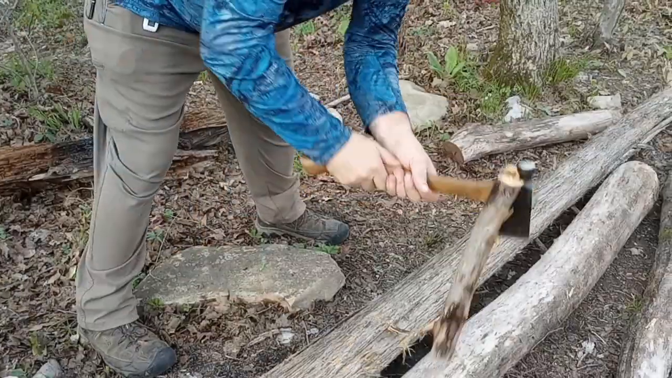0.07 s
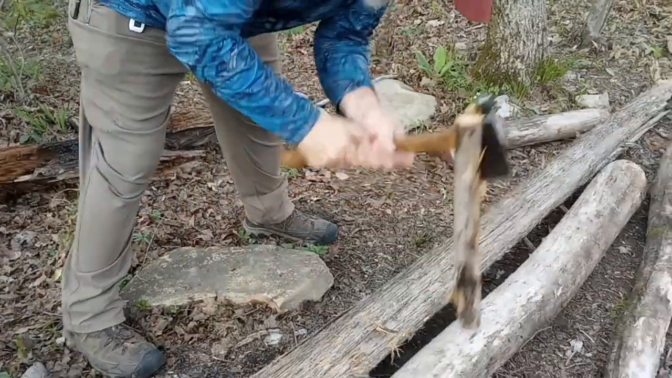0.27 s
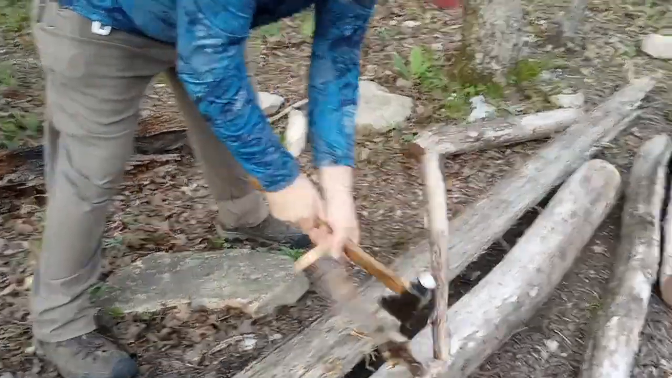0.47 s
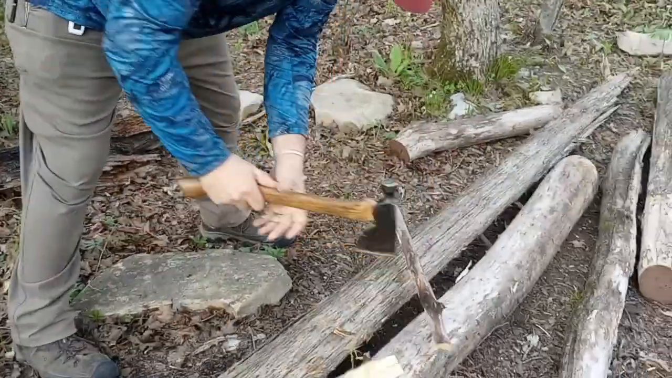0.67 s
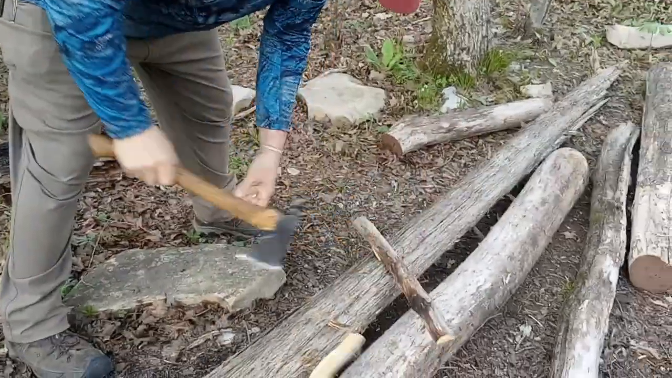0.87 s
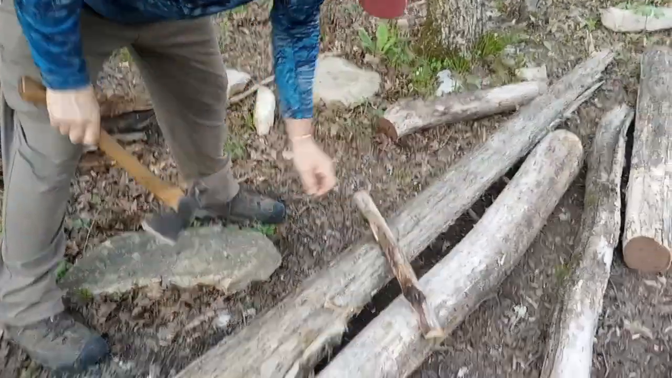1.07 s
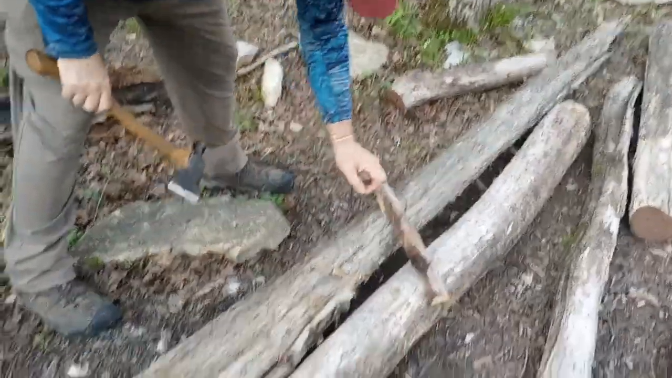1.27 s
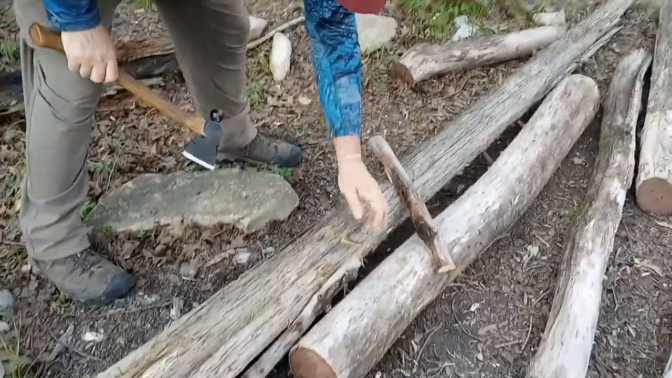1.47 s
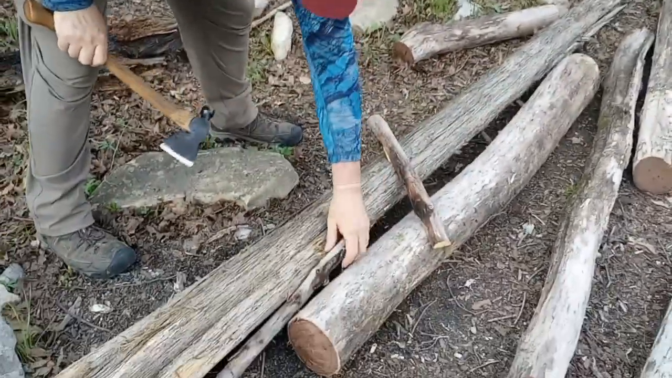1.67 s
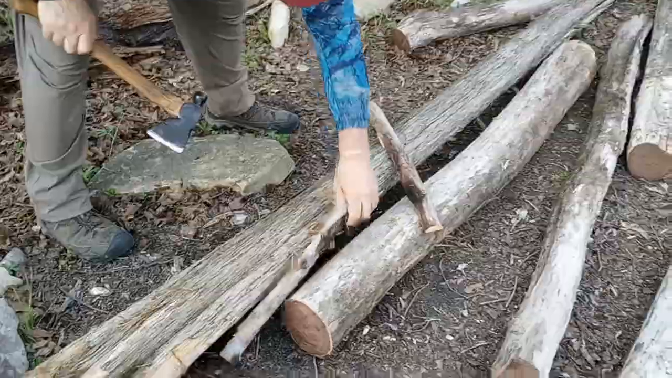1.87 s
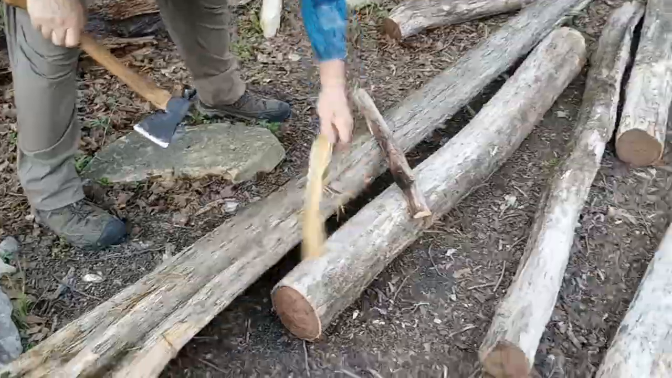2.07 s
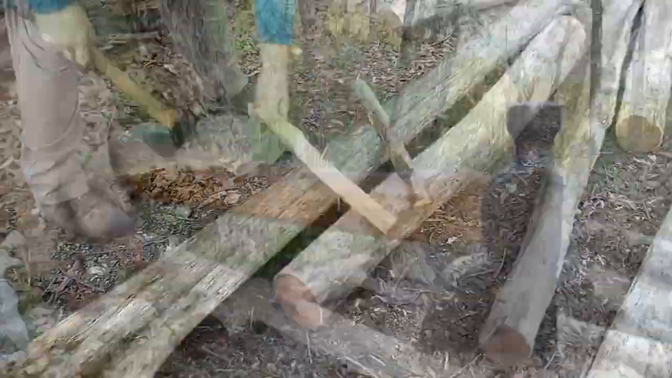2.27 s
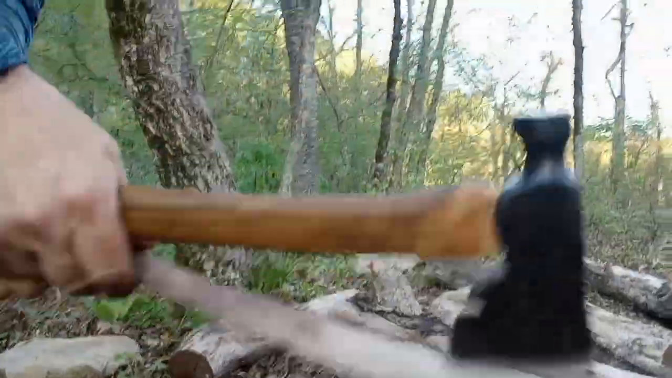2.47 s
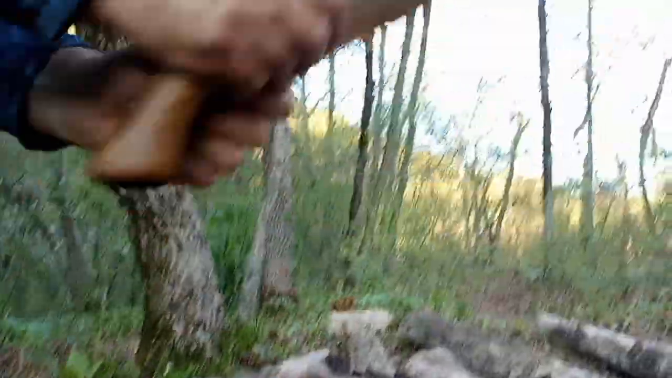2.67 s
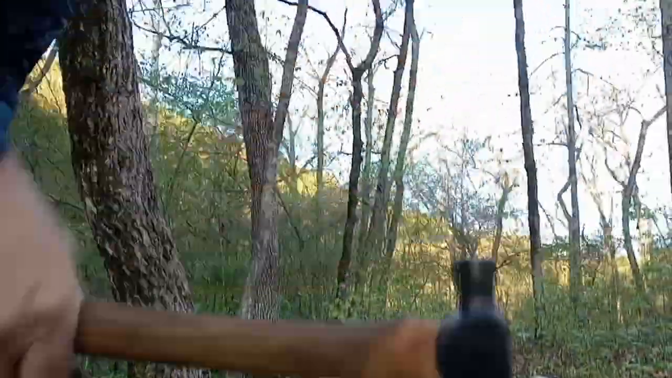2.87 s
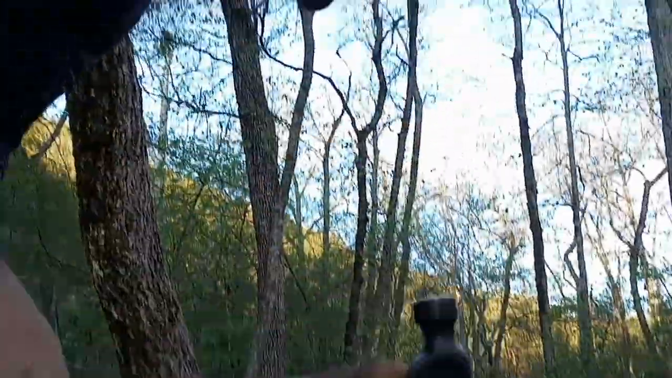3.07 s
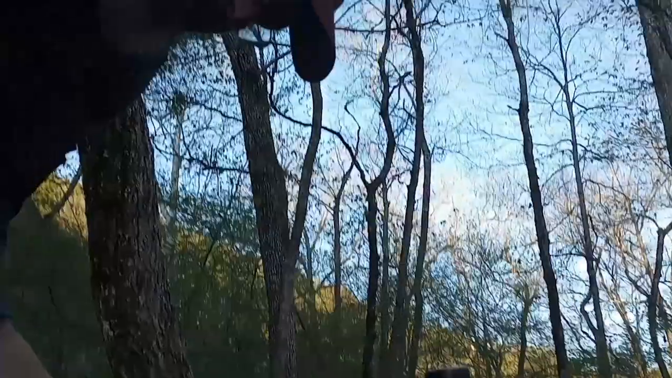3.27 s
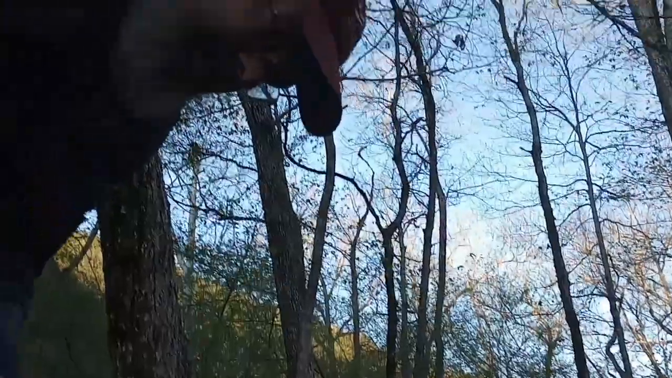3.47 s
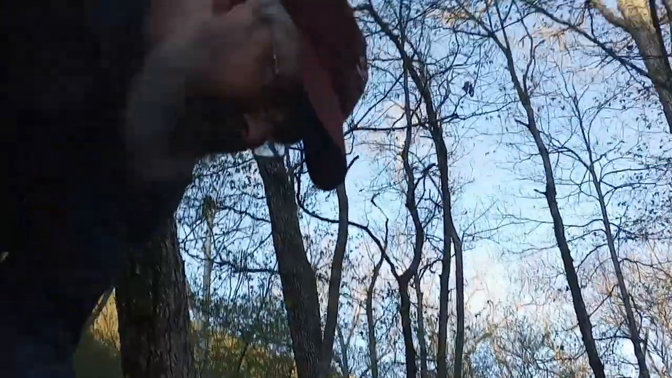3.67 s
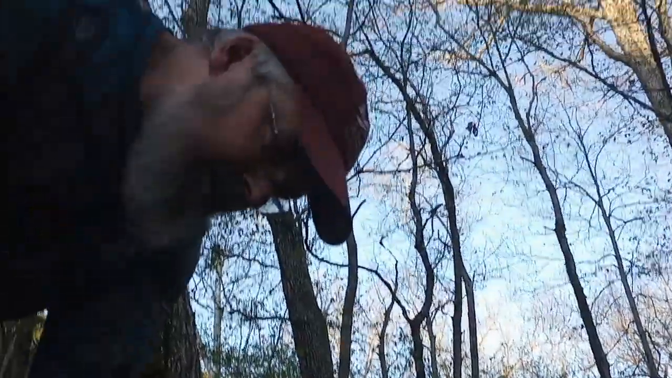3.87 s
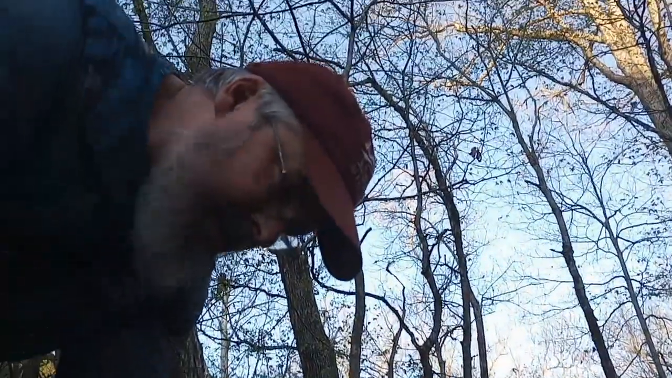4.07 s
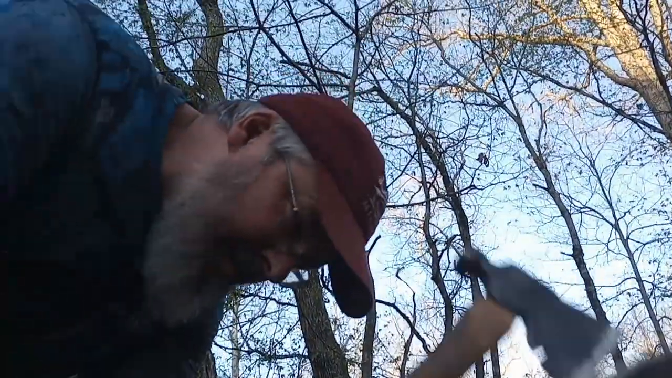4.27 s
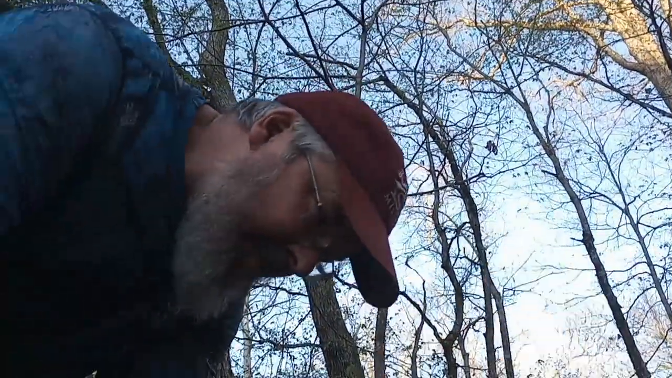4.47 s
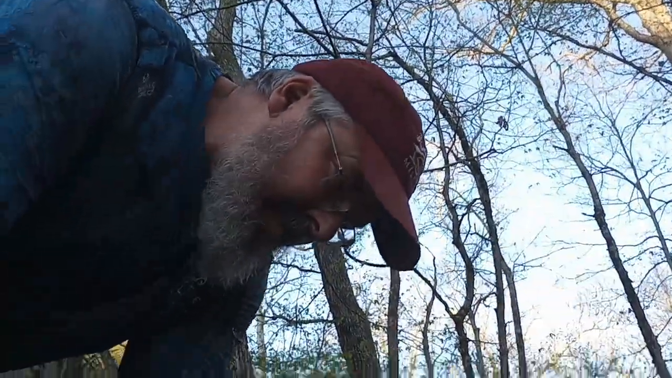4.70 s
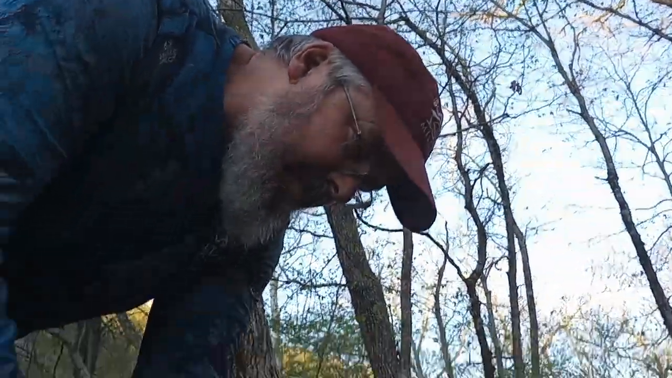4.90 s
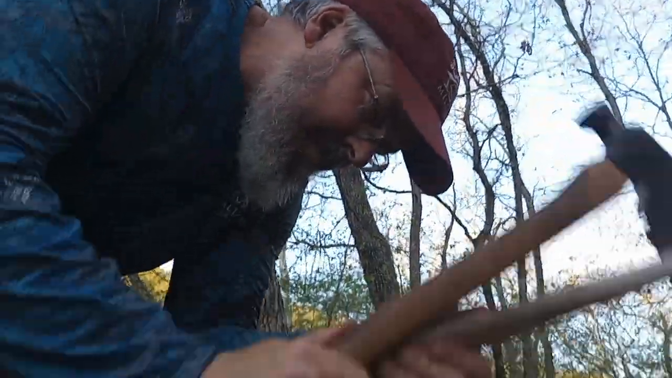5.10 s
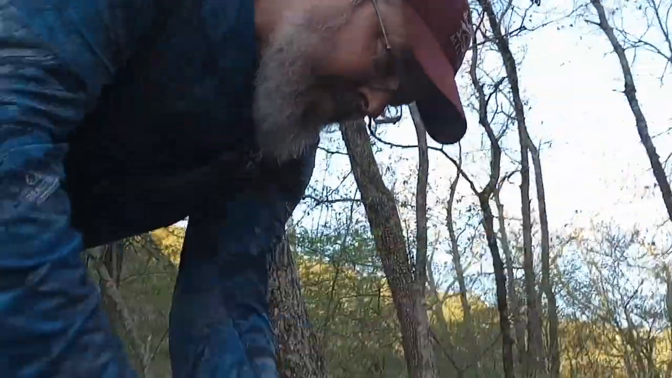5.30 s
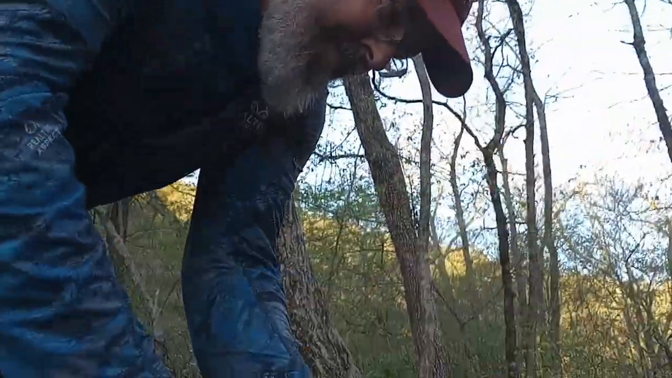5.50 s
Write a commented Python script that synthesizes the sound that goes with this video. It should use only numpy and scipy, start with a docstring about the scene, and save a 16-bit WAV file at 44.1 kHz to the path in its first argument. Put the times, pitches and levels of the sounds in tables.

```python
"""Two hatchet chops a few steps away in a quiet wood, sticks clattering and ringing, then a hard chop,
a light one and two more hard ones right beside the microphone, which overloads. Chips tick, the trees
scatter the sounds back and the forest hisses faintly. Wood and steel are sums of decaying modes;
crushing, tearing and contacts are bursts of rough coloured noise; the trees are a noisy echo response."""
import sys
import numpy as np
from scipy import signal
from scipy.fft import rfft, irfft, next_fast_len
from scipy.io import wavfile

SR = 44100
rng = np.random.default_rng(int(sys.argv[2]) if len(sys.argv) > 2 else 0)


def put_to_file(sound):
    """Save the sound as 16-bit audio at rate SR, in the file named by the first command-line argument."""
    columns = np.atleast_2d(sound).T  # one column per channel
    safe = np.clip(columns, -1, 1)
    whole_steps = np.round(safe * 32767)
    wavfile.write(sys.argv[1], SR, whole_steps.astype(np.int16))


N = 244314
TIME = np.arange(N) / SR
AGE = TIME[:SR // 2]  # seconds since the start of one short sound


def from_db(db):
    """Decibels to gain."""
    return 10 ** (np.asarray(db) / 20)


def rms_one(x):
    """Scale to unit rms."""
    return x / np.sqrt(np.mean(x ** 2) + 1e-20)


def at_hz(points, hz):
    """Read a table on a log-frequency axis."""
    table = np.array(points)
    return np.interp(np.log(hz + 1e-6), np.log(table[:, 0]), table[:, 1])


def add(out, start_s, sound, left_right_db=0):
    """Mix a sound in at a time and a side; positive is louder on the left."""
    start = max(round(start_s * SR), 0)
    sides = rms_one(from_db([[left_right_db / 2], [-left_right_db / 2]]))
    out[:, start:start + sound.shape[-1]] += (sides * sound)[:, :N - start]


def colour(x, gain):
    """Causal (minimum-phase) filter with the given gain per frequency bin."""
    size = 2 * (len(gain) - 1)
    cepstrum = irfft(np.log(gain))
    # folding the cepstrum onto positive times makes the filter causal
    cepstrum[1:size // 2] *= 2
    cepstrum[size // 2 + 1:] = 0
    response = np.exp(rfft(cepstrum))
    return irfft(rfft(x, size) * response)[:len(x)]


def two_ports(pair, spectrum, likeness):
    """Colour two unrelated signals and blend them into left and right, as alike as the table says."""
    hz = np.fft.rfftfreq(2 * next_fast_len(pair.shape[-1]), 1 / SR)
    gain = rms_one(from_db(at_hz(spectrum, hz)))
    alike = np.clip(at_hz(likeness, hz), -.99, .99)
    mid = colour(pair[0], gain * np.sqrt((1 + alike) / 2))
    side = colour(pair[1], gain * np.sqrt((1 - alike) / 2))
    return np.array([mid + side, mid - side])


def rough_noise(shape, uneven_db):
    """Two unrelated noises of very uneven grain under one envelope."""
    grain = from_db(uneven_db * rng.standard_normal(len(AGE)))
    return rng.standard_normal((2, len(AGE))) * grain * shape


# left-right likeness of blows and contacts: pitch_hz, correlation (held within +-0.99)
BLOW_LIKENESS = [(100, -0.94), (200, 0.94), (400, 0.41), (1000, 0.56), (2000, -0.39), (4000, -0.52),
                 (6500, 0.87), (12000, -2.3)]


def fracture(rise_s, length_s, spectrum, grain_db, steepness):
    """A swarm of tiny breaks of uneven size that swells and dies."""
    fall = np.exp(-(np.maximum(AGE - rise_s, 0) / length_s) ** steepness)
    swell = np.minimum(AGE / rise_s, 1) * fall
    breaks = two_ports(rough_noise(swell, grain_db), spectrum, BLOW_LIKENESS)
    return rms_one(breaks) * np.sqrt(np.mean(swell ** 2))


def contact(pitch_hz, length_s, below_db, above_db):
    """A brief contact: a hump in the spectrum that falls away over three octaves to either side."""
    hump = [(pitch_hz / 8, below_db), (pitch_hz / np.sqrt(2), 0),
            (pitch_hz * np.sqrt(2), 0), (pitch_hz * 8, above_db)]
    return fracture(.0003, length_s, hump, grain_db=3, steepness=1)


def ring(modes, t60_share=1, attack_s=.0005, spread_hz=2000):
    """Decaying modes, slightly uneven in level; the high ones reach the two ports out of step."""
    out = 0
    for pitch_hz, level_db, t60_s in modes:
        height = pitch_hz / spread_hz
        apart = min(height, 1) ** 2 * np.pi / 4 * rng.choice([-1, 1]) * np.array([[1], [-1]])
        gain = from_db(level_db + rng.normal(0, .7) - 60 * AGE / (t60_s * t60_share))
        phase = apart + rng.normal(0, min(height, 2))
        out = out - gain * np.sin(2 * np.pi * pitch_hz * AGE + phase)
    return out * (1 - np.exp(-AGE / attack_s))


def struck(modes, favoured_hz, q):
    """The place and hardness of a contact favour some modes."""
    favoured = []
    for pitch_hz, level_db, t60_s in modes:
        detuning = q * (pitch_hz / favoured_hz - favoured_hz / pitch_hz)
        favoured.append((pitch_hz, level_db - 10 * np.log10(1 + detuning ** 2), t60_s))
    return favoured


# left-right likeness of the distant hiss and the echoes: pitch_hz, correlation
HISS_LIKENESS = [(100, 0.9), (400, 0.8), (1000, 0), (2000, 0.2), (5000, 0)]
# the steady forest air, relative spectrum: pitch_hz, level_db per Hz
AIR = [(30, -37.5), (60, -16.5), (145, -4), (400, -13.5), (800, -13), (1050, -21.5), (2050, -9),
       (2600, -19), (5000, -16.5), (8000, -24), (12000, -41), (16000, -39.5)]
AIR_DB = -60


def hiss(spectrum):
    """Smooth, wide noise from far off, at unit rms."""
    return rms_one(two_ports(rng.standard_normal((2, N)), spectrum, HISS_LIKENESS))


# the far rush of the forest, relative spectrum: pitch_hz, level_db per Hz
RUSH = [(40, -30), (140, -5), (350, -16), (750, -4.5), (1150, -4.5), (1800, 5.5), (4300, -12), (6300, -5),
        (8000, -21.5), (10200, -26.5), (12500, -31), (16000, -32.5)]
RUSH_DB, RUSH_DROPS_AT_S, RUSH_DROP_S = -51, 2.05, 0.18
RUSH_DROP_DB, RUSH_SINK_DB_PER_S = 4, 3


def far_rush():
    """The rush of the forest: steady noise at first, then a quick drop and a slow ebb in level."""
    since_s = np.maximum(TIME - RUSH_DROPS_AT_S, 0)
    drop_db = RUSH_DROP_DB * np.minimum(since_s / RUSH_DROP_S, 1)
    level_db = RUSH_DB - drop_db - RUSH_SINK_DB_PER_S * since_s
    return from_db(level_db) * hiss(RUSH)


# what the near trunks send back, relative spectrum: pitch_hz, level_db per Hz
TREES = [(100, -2), (400, -7), (600, 2), (900, -12), (1300, -1.5), (1800, -0.5), (3300, 3), (4500, 0),
         (6500, 3), (10000, -4.5), (16000, -10.5)]
# what the farther stand sends back, relative spectrum: pitch_hz, level_db per Hz
FAR_TREES = [(150, 1.5), (400, -27), (800, -2.5), (1000, -6), (1300, 5), (1700, 2), (2300, 7.5), (3300, 5),
             (5000, 7.5), (8000, -2.5), (16000, -11)]


def echoes(shape, spectrum, uneven_db=6):
    """Many uneven paths among the trunks, as a coloured noise response."""
    paths = rms_one(rough_noise(shape, uneven_db))
    return two_ports(paths, spectrum, HISS_LIKENESS) / np.sqrt(len(AGE))


def forest(x, scatter_db=-25, t60_s=0.37, far_db=-34, far_s=0.19, far_width_s=0.053):
    """Trunks of all sizes scatter a thin, rough tail, and a farther stand answers late."""
    near_shape = from_db(-60 * AGE / t60_s) * (1 - np.exp(-(AGE / 0.02) ** 2))
    far_shape = np.exp(-np.abs(AGE - far_s) / far_width_s)
    near = from_db(scatter_db) * echoes(near_shape, TREES)
    far = from_db(far_db) * echoes(far_shape, FAR_TREES)
    return signal.fftconvolve(x, near + far, axes=1)[:, :N]


# chips, twigs and dry leaves snap: start_s, level_db, pitch_hz, left_right_db, ring_db (re level_db)
TICKS = [(1.1804, -36, 6510, -11, -15), (2.5615, -33, 5080, -7.5, -14), (3.253, -31.5, 1720, 5, -20),
         (3.3539, -23, 1760, 4.5, -13.5), (3.4234, -26, 2066, -4.5, -17), (3.5108, -35, 1960, -8, -15),
         (3.5937, -35.5, 1980, -8, -20), (3.7179, -33.5, 2710, 6, -15), (3.8685, -22.5, 7300, -8, -20),
         (4.9469, -34.5, 5670, -9, -19.5)]
# noise level, ring decay; noise length at 5 kHz, longer for a brighter snap (power of pitch)
TICK_DB, TICK_RING_T60_S = -4.5, 0.054
TICK_LENGTH_S, TICK_LENGTH_POWER = 0.0033, 0.72


def ticks():
    """Bright crackles: a short burst of noise with a ring at the same pitch."""
    out = np.zeros((2, N))
    for start_s, level_db, pitch_hz, left_right_db, ring_db in TICKS:
        length_s = TICK_LENGTH_S * (pitch_hz / 5000) ** TICK_LENGTH_POWER
        snap = from_db(TICK_DB) * contact(pitch_hz, length_s, below_db=-13.5, above_db=-33)
        tone = ring([(pitch_hz, ring_db, TICK_RING_T60_S)])
        add(out, start_s, from_db(level_db) * (snap + tone), left_right_db)
    return out


# dull bumps of wood, hands and boots: start_s, level_db, pitch_hz, left_right_db, ring_db (re level_db)
BUMPS = [(2.094, -39, 324, 5, -8), (2.361, -24.5, 1102, -0.5, -4.5), (3.219, -27.5, 414, -1.0, -6),
         (3.376, -36.5, 736, 14, -5), (3.698, -31, 930, 15.0, -3), (3.715, -27.5, 510, 15.5, -8),
         (3.93, -19.5, 320, 21.0, -8.5), (3.961, -40.5, 800, 9, -7)]
# noise level, ring decay; noise length at 1 kHz, longer for a lower bump (power of pitch)
BUMP_DB, BUMP_RING_T60_S = -3, .035
BUMP_LENGTH_S, BUMP_LENGTH_POWER = 0.0036, -0.23


def bumps():
    """Dull knocks: a short burst of noise with a ring at the same pitch."""
    out = np.zeros((2, N))
    for start_s, level_db, pitch_hz, left_right_db, ring_db in BUMPS:
        length_s = BUMP_LENGTH_S * (pitch_hz / 1000) ** BUMP_LENGTH_POWER
        bump = from_db(BUMP_DB) * contact(pitch_hz, length_s, below_db=-7, above_db=-42.5)
        tone = ring([(pitch_hz, ring_db, BUMP_RING_T60_S)])
        add(out, start_s, from_db(level_db) * (bump + tone), left_right_db)
    return out


# modes of the long stick: pitch_hz, level_db, t60_s
STICK = [(197.2, -12.5, 0.56), (505.8, 1, 0.49), (918, 1, 0.21), (1100, -14.5, 0.058), (1391, -8, 0.11),
         (1825, -17.5, 0.22)]
# the long stick is struck or lands: start_s, level_db, favoured_hz, selectivity_q,
# t60_share (of the free ring time), turns_per_s, end_on_s, bright_db (of the noise burst)
STICK_KNOCKS = [(0.0, -35.5, 735, 1.2, 0.64, 1.065, 0.039, -67),
                (0.4282, -9, 713, 1.33, 0.79, 7.9, 0.047, -40),
                (0.837, -20, 596, 0.3, 0.7, 1.045, 0.066, -42.5),
                (0.889, -30, 700, 1.3, 0.8, 13.9, 0.026, -42),
                (2.3615, -28, 1164, 0.83, 0.47, 1.005, 0.095, -54)]
# modes of the short split piece: pitch_hz, level_db, t60_s
PIECE = [(409, 0, 0.39), (506, -4, 0.29), (715, -11, 0.19), (2040, 14, 0.063)]
# the short piece bounces: same columns as the long stick's knocks
PIECE_KNOCKS = [(1.081, -28.5, 430, 1.54, 0.94, 0, .1, -43), (1.185, -29, 710, 11.6, 0.99, 0, .1, -51)]
# each knock carries a soft burst of bright noise at its own level
BRIGHT_HZ, BRIGHT_LENGTH_S, BRIGHT_LEFT_RIGHT_DB = 4000, .018, -14


def kindling(end_on_db=-15):
    """Dry sticks ring like xylophone bars, with bright noise; a tumbling one fades when end-on to us."""
    out = np.zeros((2, N))
    for modes, knocks in ((STICK, STICK_KNOCKS), (PIECE, PIECE_KNOCKS)):
        for start_s, level_db, favoured_hz, q, t60_share, turns, end_on_s, bright_db in knocks:
            facing = 1
            if turns > 1:  # tumbling: an end comes round twice a turn
                broadside = np.sin(2 * np.pi * turns * (AGE - end_on_s))
                facing = np.hypot(broadside, from_db(end_on_db))
            knock = facing * ring(struck(modes, favoured_hz, q), t60_share, attack_s=0.001)
            bright = contact(BRIGHT_HZ, BRIGHT_LENGTH_S, below_db=-10, above_db=-40)
            add(out, start_s, from_db(level_db) * knock)
            add(out, start_s, from_db(bright_db) * bright, BRIGHT_LEFT_RIGHT_DB)
    return out


# modes of the steel head while the wood grips it: pitch_hz, level_db, t60_s
HEAD = [(3320, 2, .028), (4205, -1, .022), (5270, -3, .046), (6740, 6.5, .016)]
# the head, free of the wood, sings on in one mode: start_s, pitch_hz, level_db, t60_s
FREE_RINGS = [(.5, 5330, -38, .55), (4.947, 5660, -38.5, .075)]
HEAD_Q, HEAD_LEFT_RIGHT_DB = 15, -16


def pings(lag_s=0.0033):
    """The steel head rings at each chop, cut short while the wood grips it, and sings once it is free."""
    out = np.zeros((2, N))
    for start_s, *_, favoured_hz, head_db, _ in CHOPS:
        ping = ring(struck(HEAD, favoured_hz, HEAD_Q), attack_s=0.00041)
        add(out, start_s + lag_s, from_db(head_db) * ping, HEAD_LEFT_RIGHT_DB)
    for start_s, *mode in FREE_RINGS:
        add(out, start_s, ring([mode], attack_s=.001), HEAD_LEFT_RIGHT_DB)
    return out


def roughened(tearing, count=28, level_db=-42, t60_s=0.0058):
    """The tearing is roughened by many very short rings at random high pitches."""
    pitches_hz = np.exp(rng.uniform(np.log(2200), np.log(13000), count))
    response = ring([(pitch_hz, level_db, t60_s) for pitch_hz in pitches_hz])
    response[:, 0] += 1  # the tearing itself passes through
    rough = signal.fftconvolve(tearing, response, axes=1)[:, :len(AGE)]
    return rms_one(rough) * np.std(tearing)


# the chopping block: pitch_hz, level_db, t60_s
BLOCK = [(289, 1, 0.072), (395, -2.5, 0.094), (485, -14, 0.11), (723, -10.5, 0.088), (905, -2.5, 0.056),
         (1260, -2.5, 0.043)]
# the ground's one low mode: pitch_hz, level_db, t60_s
GROUND = [(127, 0.00072, 0.091)]
# the clank of the edge on a hard billet: pitch_hz, level_db, t60_s
EDGE = [(565.5, -10, .035), (814, -8.5, .035), (961, -11.5, 0.12), (1520, -6, 0.03), (1804, 1, 0.099),
        (1865, -6, .03), (2038, -5.5, 0.089), (2370, -13, 0.079), (3050, -19.5, .04), (3260, -16.5, 0.01)]
# wood crushed under the edge, relative spectrum before the tilt: pitch_hz, level_db per Hz
CRUSH = [(40, -24.5), (110, -11), (300, 6), (550, 4), (1000, 0.5), (1400, -4), (1850, 0.5), (2400, -6),
         (3500, -4), (6000, -28.5), (16000, -44.5)]
# a harder blow crushes brighter: dB per octave for each dB above the neutral strength
TILT_PER_DB, NEUTRAL_CRUSH_DB = 0.13, -10.5
# the low boom after a blow, relative spectrum: pitch_hz, level_db per Hz
BOOM = [(50, -29.5), (120, -4), (150, -4), (178, 1.5), (215, -12), (400, -25.5), (600, -24.5), (1000, -36),
        (3000, -61)]
BOOM_DB = -12.5  # relative to the ground thump
# wood tearing along the grain, relative spectrum: pitch_hz, level_db per Hz
TEAR = [(300, -11), (1500, -10.5), (3100, -2.5), (4200, -1), (5200, -6.5), (6600, 1), (8000, -12),
        (10500, -11.5), (13000, -16.5), (16000, -16.5)]
SPLIT_RISE_S, SPLIT_LENGTH_S, SPLIT_LEFT_RIGHT_DB = 0.0037, .007, -12
# stray fibres tear before and after the split; level relative to it
FIBRES_DB, FIBRES_LENGTH_S = -18.5, 0.018


def chop(thud_db, clank_db, crush_db, length_s, ground_db, gives_s, split_db,
         boom_lag_s=0.034, boom_rise_s=0.014, boom_length_s=0.035):
    """The edge crushes wood, block and ground thud, fibres tear along the grain, a low boom follows."""
    out = np.zeros((2, SR))
    add(out, 0, from_db(thud_db) * ring(BLOCK, attack_s=0.00042))
    add(out, 0, from_db(ground_db) * ring(GROUND, attack_s=.003), left_right_db=-5.5)
    add(out, 0, from_db(clank_db) * ring(EDGE, attack_s=0.00023), left_right_db=-5.0)
    tilt = TILT_PER_DB * (crush_db - NEUTRAL_CRUSH_DB)
    spectrum = [(hz, level_db + tilt * np.log2(hz)) for hz, level_db in CRUSH]
    crush = fracture(.0005, length_s, spectrum, grain_db=2.5, steepness=1.3)
    add(out, 0, from_db(crush_db) * crush, left_right_db=1)
    boom = fracture(boom_rise_s, boom_length_s, BOOM, grain_db=1, steepness=1.3)
    add(out, boom_lag_s, from_db(ground_db + BOOM_DB) * boom)
    split = fracture(SPLIT_RISE_S, SPLIT_LENGTH_S, TEAR, grain_db=4, steepness=1.2)
    add(out, gives_s, from_db(split_db) * roughened(split), SPLIT_LEFT_RIGHT_DB)
    fibres = fracture(gives_s + SPLIT_RISE_S, FIBRES_LENGTH_S, TEAR, grain_db=5, steepness=1.2)
    add(out, 0, from_db(split_db + FIBRES_DB) * roughened(fibres), SPLIT_LEFT_RIGHT_DB)
    return out


# chops, two a few steps away and four beside the microphone: start_s, block_thud_db, edge_clank_db,
# crush_db, crush_length_s, ground_thump_db, gives_s (until the wood gives), split_db,
# favoured_head_hz, head_ring_db, sent_db (into the trees, relative to the direct sound)
CHOPS = [(0.4236, -46, -54, -32, 0.044, -64, .022, -8, 4300, -16, -0.5),
         (0.6968, -41, -12.5, -17.5, 0.01, -58, .008, -18, 3290, -14.5, 3.5),
         (2.9598, -11.5, -19.5, 1, 0.0057, -11, .002, -8, 6400, -22.5, -6),
         (3.145, -21.5, -50, -19.5, 0.0074, -25, .004, -19.5, 4300, -39, -1),
         (4.5358, -6, -26.5, -1, .0074, -18.5, .001, -8, 3514, 2.5, -1.5),
         (5.3787, -6.5, -10.5, 0, .011, -20.5, .001, -4, 5320, -0.5, -1.5)]


def hatchet():
    """All the chops, as heard directly and as sent out among the trees."""
    direct, sent = np.zeros((2, 2, N))
    for start_s, *blow, _, _, sent_db in CHOPS:
        sound = chop(*blow)
        add(direct, start_s, sound)
        add(sent, start_s, from_db(sent_db) * sound)
    return direct, sent


def scene():
    """Blows and small contacts among the trees, over the forest's hiss; the thin pings hardly carry."""
    background = far_rush() + from_db(AIR_DB) * hiss(AIR)
    clatter = kindling() + ticks() + bumps()
    head = pings()
    chops, sent = hatchet()
    scattered = forest(sent + clatter + from_db(-20.5) * head)
    return chops + clatter + head + scattered + background


def record(dry, port_hz=15100, port_q=14, port_db=9, low_cut_hz=65, stop_hz=16900):
    """The microphone ports resonate at the very top, bass is cut, the closest blows overload the input."""
    port = signal.lfilter(*signal.iirpeak(port_hz, port_q, fs=SR), dry)
    heard = dry + from_db(port_db) * port
    low_cut = signal.butter(2, low_cut_hz, "high", fs=SR, output="sos")
    heard = signal.sosfilt(low_cut, heard)
    rounded = heard / (1 + heard ** 6) ** (1 / 6)  # soft limit at 1
    top_cut = signal.cheby2(14, 60, stop_hz, fs=SR, output="sos")  # 60 dB down from stop_hz up
    return signal.sosfilt(top_cut, .95 * rounded)


dry = scene()
out = record(dry)
put_to_file(out)
```